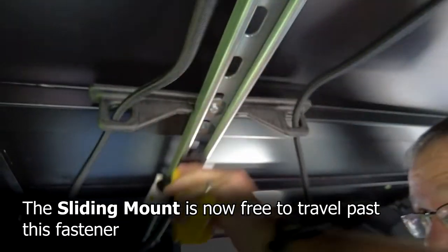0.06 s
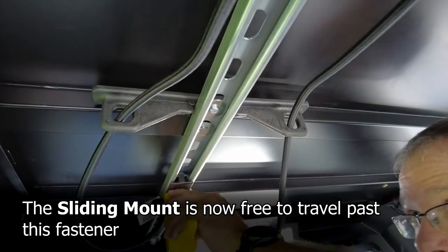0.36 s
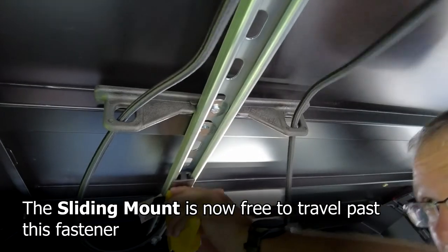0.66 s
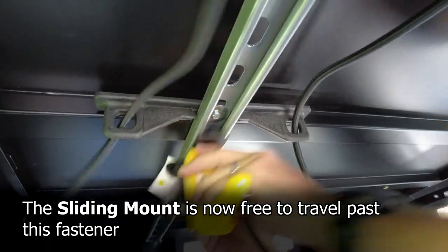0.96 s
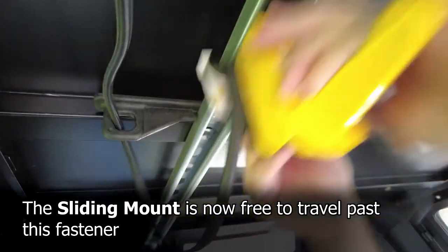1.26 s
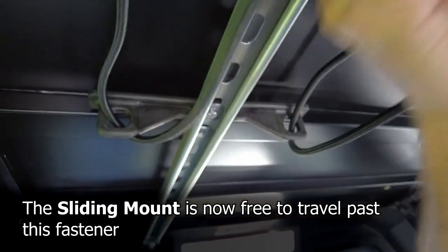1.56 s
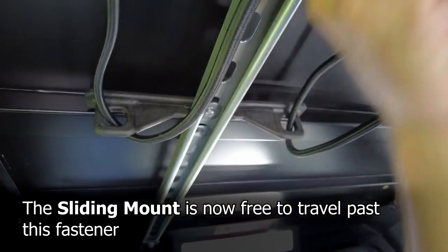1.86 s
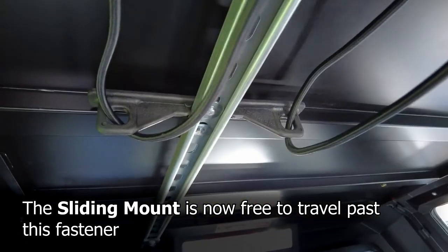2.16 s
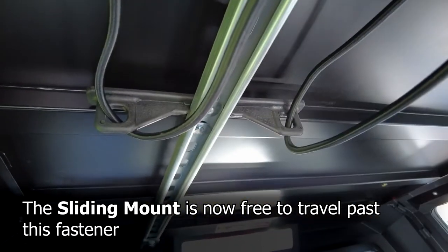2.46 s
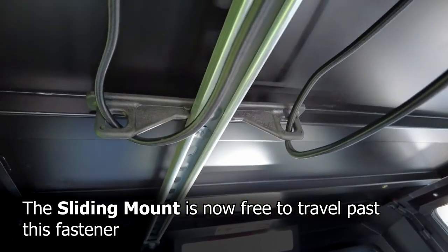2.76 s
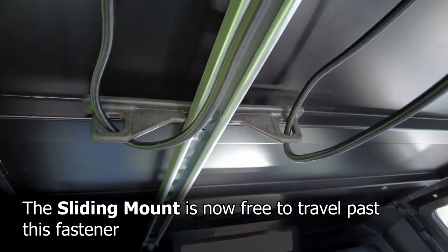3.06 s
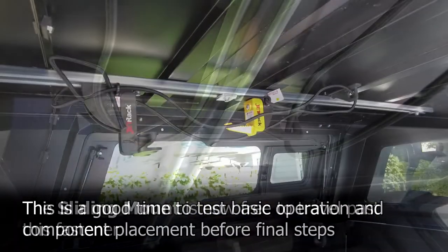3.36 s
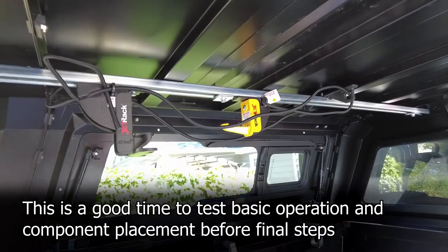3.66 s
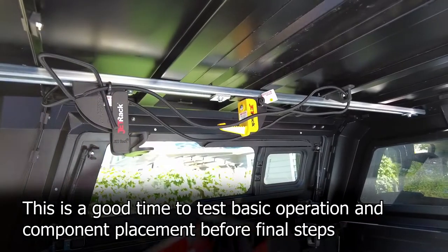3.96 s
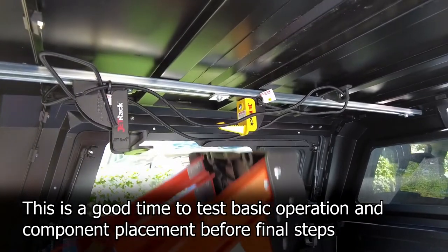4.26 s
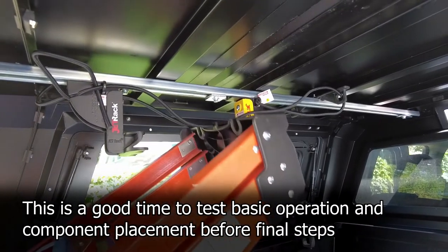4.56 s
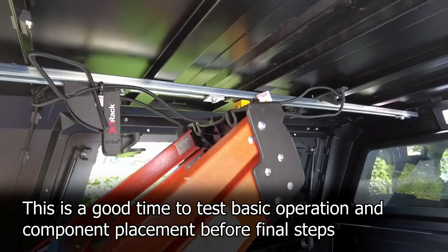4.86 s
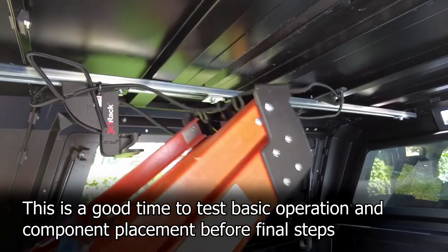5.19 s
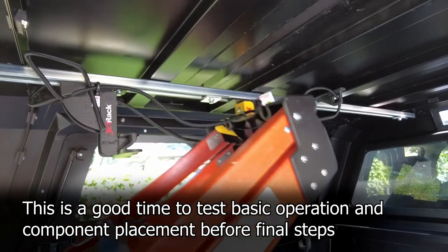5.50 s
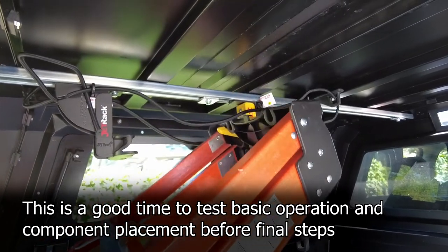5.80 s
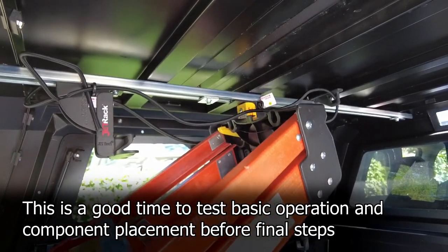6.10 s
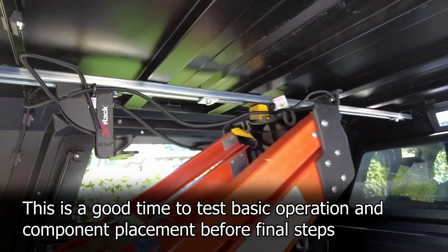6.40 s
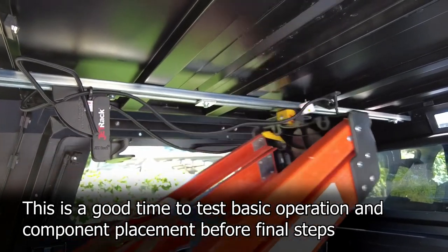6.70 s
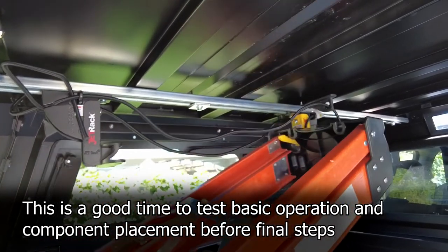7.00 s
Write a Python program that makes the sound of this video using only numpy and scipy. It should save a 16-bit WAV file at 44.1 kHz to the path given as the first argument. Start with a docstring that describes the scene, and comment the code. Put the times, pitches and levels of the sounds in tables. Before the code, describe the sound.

Inside a covered truck bed, a metal mount is pushed along a roof rail, grinding, juddering and briefly squealing before it clacks against its stop. A few light ticks follow in a lull. Then a ladder knocks and rattles onto the mount and drags it further, making the wide roof panel boom deeply. The sounds are close, with a short enclosed echo and faint insects outside.

```python
"""Under a truck cap (the shell over a truck bed), a metal mount is pushed along a roof rail.
Tiny catches make it grind and judder, the metal squeals as it binds, and the mount clacks on its stop.
Then a ladder is lifted, knocks and rattles onto the mount's hook and drags it further along the rail.
The pushes set the wide roof panel booming, the cap's panels tick lightly, and insects buzz outside."""
import sys
import numpy as np
from scipy import signal
from scipy.fft import rfft, irfft
from scipy.io import wavfile
from scipy.ndimage import uniform_filter1d

SR = 44100
rng = np.random.default_rng(int(sys.argv[2]) if len(sys.argv) > 2 else 0)


def dump_mix(stems):
    """Bounce the given channels to the path in sys.argv[1] as a 16-bit WAV at rate SR."""
    frames = np.atleast_2d(stems).T  # one column per channel
    limited = np.clip(frames, -1, 1)  # hard clip at full scale
    pcm = np.round(limited * 32767).astype(np.int16)
    wavfile.write(sys.argv[1], SR, pcm)


N = 314863
T = np.arange(N) / SR
THUD_BELOW_HZ, CRACK_ABOVE_HZ = 420, 2200  # a hit is a low thud, a middle ring and a high crack

# How strongly the rail sounds from bass to treble: f/Hz, level/dB
RAIL_SPECTRUM = [(65, -37.5), (110, -11.5), (177, 4.5), (227, -1.5), (358, -2), (397, -14.5), (459, -11.5),
                 (739, -24), (854, -18), (1140, -22.5), (1460, -14), (2310, -27), (3020, -29),
                 (3870, -30.5), (15500, -64.5)]
# Notes that the rail and roof, and the end stop, ring at: f/Hz, level/dB, time to fade by 60 dB/s
RAIL_NOTES = [(177, 0, .8), (212, -7, .6), (270, -9, .5), (333, -7, .6), (450, -13, .3), (850, -14, .25),
              (1265, -14, .15), (1335, -11, .12), (1440, -8, .1), (1530, -10, .1), (1690, -7, .17),
              (2000, -12, .15), (2790, -18, .12), (3060, -16, .07), (3560, -19, .07), (4500, -19, .04)]
STOP_NOTES = [(333, 1.5, 0.76), (852, -16, 0.29), (1280, -8, 0.1), (1297, 6, 0.11), (1647, -4.5, 0.09),
              (3010, -7.5, 0.029), (3590, -7.5, .04), (4444, -6.5, .022)]
# Clacks on the rail, and the hit and bounce at the stop: t/s, level/dB, hardness/dB, rattle time/s
RAIL_CLACKS = [(.68, -46, -3.5, 0.0043), (.8117, -26, -1.5, 0.0098), (.9234, -30, 0, 0.0097),
               (.9883, -32, -23.5, 0.0079), (1.0102, -27.5, 1.5, 0.0046), (1.138, -28, -4, 0.013),
               (1.2492, -31.5, 1, .0015), (1.4243, -37, -24, 0.007), (1.5036, -28, 2.5, 0.00332)]
STOP_CLACKS = [(1.6193, -14, -4, 0.00168), (1.6228, -12.5, -12, 0.0019)]
# Pushes along the rail: t/s, rise/s, hold/s, level/dB, pressure/dB
MOUNT_PUSHES = [(-.03, 0.054, 0.18, -35.5, -2), (.22, 0.05, 0.057, -42, 7), (.65, 0.025, 0.048, -52, 8),
                (.735, 0.13, 0.1, -40, -6.5), (.962, 0.031, 0.05, -27, 6),
                (1.02, 0.041, 0.028, -29.5, -5.5), (1.1, 0.038, .12, -29, 5.5), (1.27, 0.032, .14, -35, -1),
                (1.46, 0.048, 0.082, -33.5, -8), (1.7, 0.01, 0.064, -58, 25),
                (1.87, 0.012, 0.23, -71, 20.5), (2.12, .12, 0.031, -64, -13.5)]
def mount():
    """The metal mount clacks and grinds along its rail and bounces off the end stop."""
    rail = struck_part(RAIL_SPECTRUM, RAIL_NOTES, notes_db=-4, direct_db=-2.5)
    stop = struck_part(RAIL_SPECTRUM, STOP_NOTES, notes_db=1, direct_db=0)
    clacks = knocks(RAIL_CLACKS, rail, rattle_db=1.5, grit_db=-1.5,
                    thud_db=-4.5, thud_per_hardness=0.6, thud_lag_s=0.0029)
    clacks += knocks(STOP_CLACKS, stop, rattle_db=-6, grit_db=5,
                     thud_db=-8, thud_per_hardness=0.1, thud_lag_s=0.0025)
    pushes = strokes(MOUNT_PUSHES, sag_db_per_s=4.5, stop_db_per_s=261,
                     judder_db=-0.5, hiss_db=-3, hiss_per_pressure=0.43)
    return clacks + scrape(pushes, rail, RAIL_SPECTRUM, catches_per_s=1200,
                           grit_db=6.5, smooth_db=1, uneven_db=2, sheen_db=19.5)


# How strongly the ladder sounds from bass to treble: f/Hz, level/dB
LADDER_SPECTRUM = [(65, -21), (110, -10), (227, -6), (423, -10), (626, -8.5), (754, -21), (837, -10),
                   (967, -18.5), (1030, -12), (1380, -9.5), (1660, -10.5), (2260, -19), (3210, -15.5),
                   (3640, -19), (15500, -37.5)]
# Notes that the ladder rings at: f/Hz, level/dB, time to fade by 60 dB/s
LADDER_NOTES = [(148.4, -2, 0.86), (178.8, 3, 0.36), (214.4, 3, 0.53), (246.3, 1, 0.27), (357, -10, 0.55),
                (452, -4.5, 0.26), (625.5, -11, 0.16), (850.5, 2.5, 0.11), (1071, -0.5, 0.26),
                (1290, -16, .15), (1618, 0, 0.043), (1715, 2, 0.051), (1955, -12.5, 0.19),
                (2600, -18, 0.19), (2600, -6, 0.086), (3430, -13.5, 0.1), (4600, 4, 0.021)]
# Bumps of the ladder: t/s, level/dB, hardness/dB, rattle time/s
LADDER_BUMPS = [(4.42, -53.5, -8, 0.0025), (4.529, -33, -13, 0.0095), (4.5467, -29, -22, 0.011),
                (5.173, -29, -15.5, 0.006), (5.1865, -21, -17.5, 0.0041), (5.439, -21, -2.5, 0.01),
                (5.5299, -17.5, -8, 0.015), (5.545, -29.5, -23, 0.051), (5.574, -24, 0.5, 0.013),
                (5.748, -36.5, -22, 0.0026), (5.921, -41.5, -10, 0.011), (6.872, -24, -16.5, 0.015),
                (7.1, -42, -1.5, 0.011)]
# Drags of the ladder: t/s, rise/s, hold/s, level/dB, pressure/dB
LADDER_DRAGS = [(4.885, 0.0053, .14, -49.5, 10), (5.2, 0.028, .08, -45, 4.5),
                (5.412, 0.022, .005, -37.5, 3), (5.66, 0.05, 0.032, -52, 8.5),
                (5.96, 0.013, 0.022, -62, 18), (6.16, 0.62, .55, -39, 0), (6.58, 0.022, 0.079, -41, -7)]
def ladder():
    """The ladder rattles onto the hook and scrapes as it drags the mount along."""
    frame = struck_part(LADDER_SPECTRUM, LADDER_NOTES, notes_db=-3.5, direct_db=-6.5)
    bumps = knocks(LADDER_BUMPS, frame, rattle_db=12.5, grit_db=10.5,
                   thud_db=-4, thud_per_hardness=0.34, thud_lag_s=0.00691)
    drags = strokes(LADDER_DRAGS, sag_db_per_s=33.5, stop_db_per_s=143,
                    judder_db=3.5, hiss_db=-9, hiss_per_pressure=0.29)
    return bumps + scrape(drags, frame, LADDER_SPECTRUM, catches_per_s=1500,
                          grit_db=6, smooth_db=-0.5, uneven_db=2.5, sheen_db=4)


# How long the cap echoes, treble dying first: f/Hz, time to fade by 60 dB/s
CAP_ECHO = [(150, 0.67), (350, 0.38), (700, 0.38), (1500, 0.15), (3500, 0.12), (12000, 0.11)]
def struck_part(spectrum, notes, notes_db, direct_db):
    """One hit on a part under the cap: echoes and notes, split into thud, ring and crack of equal energy."""
    t = T[:SR]
    noise, echo = rfft(stereo_noise(SR)), 0
    centres_hz = np.geomspace(100, 16000, 9)
    for hz, share in zip(centres_hz, np.eye(len(centres_hz))):
        fade_s = look_up(CAP_ECHO, hz)
        band = irfft(noise * look_up(np.c_[centres_hz, share], np.arange(noise.shape[-1])), SR)
        echo = echo + band * die_away(t, fade_s) / np.sqrt(fade_s)
    echo = unit_rms(echo)
    echo[:, 0] += gain(direct_db) * np.sqrt(SR)  # the click that arrives before any echo
    # shape the tone but keep the start sharp (a minimum-phase filter)
    cepstrum = irfft(np.log(gain(look_up(spectrum, np.arange(SR // 2 + 1)))), SR)
    cepstrum[1:SR // 2] *= 2
    cepstrum[SR // 2 + 1:] = 0
    echo = irfft(rfft(echo) * np.exp(rfft(cepstrum)), SR)
    tones = 0
    for (hz, db, fade_s), (phase, lean) in zip(notes, rng.uniform(-0.95, 1, (len(notes), 2))):
        ear_shift = np.sign(lean) * np.arctan(gain(look_up(STEREO_WIDTH, hz))) * np.array([[1], [-1]])
        wave = np.sin(2 * np.pi * hz * t + np.pi * phase + ear_shift)
        tones = tones + gain(db) / np.sqrt(fade_s) * die_away(t, fade_s) * wave
    hit = unit_rms(echo) + gain(notes_db) * unit_rms(tones)
    bands = (THUD_BELOW_HZ, "low"), ((THUD_BELOW_HZ, CRACK_ABOVE_HZ), "band"), (CRACK_ABOVE_HZ, "high")
    return [unit_rms(keep_band(hit, hz, kind)) / np.sqrt(SR) for hz, kind in bands]


def knocks(table, part, rattle_db, grit_db, thud_db, thud_per_hardness, thud_lag_s):
    """Each knock is one hit and a dying rattle of loose parts; harder ones crack more and thud less."""
    out, size = np.zeros((2, N)), SR // 8
    for start_s, db, hardness_db, rattle_s in table:
        jolts, strength = rng.standard_normal((2, size))
        force = jolts * gain(grit_db * strength) * np.exp(-(T[:size] / (2 * rattle_s)) ** 2)
        force *= gain(rattle_db) / np.linalg.norm(force)
        force[0] += 1  # the hit itself
        levels_db = (db + thud_db - thud_per_hardness * hardness_db, db, db + hardness_db)
        for band, band_db, lag_s in zip(part, levels_db, (thud_lag_s, 0, 0)):
            sound = signal.fftconvolve(band, force[None], axes=1)
            peak_power = uniform_filter1d(np.mean(sound ** 2, axis=0), size=500).max()
            add(out, start_s + lag_s, gain(band_db) * sound / np.sqrt(peak_power))
    return out


def strokes(table, sag_db_per_s, stop_db_per_s, judder_db, hiss_db, hiss_per_pressure):
    """Loudness of judder, grind and hiss as slides rise, slow and stop; pressure trades hiss for judder."""
    power = np.zeros((3, N))
    for start_s, rise_s, hold_s, db, pressure_db in table:
        t = T - start_s - rise_s
        drop_db = sag_db_per_s * np.maximum(t, 0) + stop_db_per_s * np.maximum(t - hold_s, 0)
        swell = np.clip(1 + t / rise_s, 0, 1) * gain(db - drop_db)
        balance = gain([[judder_db + pressure_db], [0], [hiss_db - hiss_per_pressure * pressure_db]])
        power += (swell * balance) ** 2
    return np.sqrt(power)


def scrape(loudness, part, spectrum, catches_per_s, grit_db, smooth_db, uneven_db, sheen_db):
    """Sliding metal catches in tiny, uneven bunches that shake the part; the rubbing spot hisses."""
    judder, grind, rub = loudness
    bunches = gain(uneven_db * wander(70))
    catches = (rng.random(N) < catches_per_s / SR) * rng.standard_normal(N)
    catches *= gain(grit_db * rng.standard_normal(N))  # grit makes a few catches stand out
    force = unit_rms((unit_rms(catches) + gain(smooth_db) * rng.standard_normal(N)) * bunches)
    shake = sum(signal.oaconvolve(band, (force * amount)[None], axes=1)[:, :N]
                for band, amount in zip(part, (judder, grind)))
    delay_s = 0.0005 * wander(14)  # the rubbing spot moves, so the notes shift a little
    shake = np.array([np.interp(T - delay_s, T, side) for side in shake])
    sheen = [(4200, 0.0075), (15000, sheen_db)]  # fine roughness makes more top treble than a hit
    hiss = colour(colour(stereo_noise(N) * bunches, spectrum), sheen)
    return shake + unit_rms(keep_band(hiss, CRACK_ABOVE_HZ, "high")) * rub


# Short squeals of metal: t/s, f/Hz, level/dB, length/s
METAL_SQUEALS = [(0.097, 1620, -30, 0.042), (0.811, 2010, -24.5, 0.012), (1.423, 1484, -22.5, 0.015),
                 (1.956, 1706, -51, 0.03), (2.011, 1666, -40.5, 0.028), (2.275, 1664, -46.5, 0.0092),
                 (2.278, 1080, -57.5, 0.055), (5.525, 3180, -23.5, 0.028), (5.576, 1690, -20, 0.034),
                 (6.602, 1700, -38.5, 0.07), (6.866, 1656, -26, 0.016)]
def squeals(waver=0.011, rise_s=0.00079):
    """The metal binds and sings for a moment on one unsteady pitch."""
    out, t = np.zeros((2, N)), T[:SR // 4]
    for start_s, hz, db, length_s in METAL_SQUEALS:
        pitch_hz = hz * (1 + waver * wander(302.4)[:len(t)])
        phase = 2 * np.pi * np.cumsum(pitch_hz) / SR
        swell = (1 - np.exp(-t / rise_s)) / (1 + (t / length_s) ** 4)
        add(out, start_s, gain(db) * swell * np.sin(phase + np.array([[0], [0.9]])))
    return out


# Booms of the bending roof panel: t/s, level/dB, f/Hz
ROOF_BOOMS = [(0.327, -24.5, 50.4), (.765, -27.5, 54.2), (0.979, -26, 59), (1.1, -26.5, 50.9),
              (1.72, -25.5, 47.67), (4.929, -33, 49.6), (5.178, -10.5, 46.1), (5.614, -24, 47.2),
              (6.324, -20, 55.4), (6.415, -13.5, 58.9), (6.601, -24.5, 47.9), (6.88, -10.5, 65.2),
              (7.071, -15.5, 68.6)]
# How long a boom lasts, the deepest longest: f/Hz, time to fade by 60 dB/s
BOOM_FADE = [(47, 2.04), (51, 1.32), (56, 0.28), (64, 0.52)]
# The tone of the roof's rumble: f/Hz, level/dB
RUMBLE_SPECTRUM = [(12, -25.5), (28, -9), (38, -7), (48, -3.5), (62, -7.5), (85, -11.5), (115, -19),
                   (170, -27.5), (400, -105)]
def roof(shaking, push_s=0.014, rest_db=-56.5, flutter_db=-0.5):
    """The wide panel swings when pushed; whatever shakes it leaves a rumble that settles slowly."""
    booms, t = np.zeros((2, N)), T[:2 * SR]
    rise = np.sin(np.pi / 2 * np.minimum(t / push_s, 1)) ** 2
    for start_s, db, hz in ROOF_BOOMS:
        swell = rise * die_away(t - push_s, look_up(BOOM_FADE, hz))
        add(booms, start_s, gain(db) * swell * np.sin(2 * np.pi * hz * t))
    panel_shiver = linger(gain(-6) * shaking, seconds=0.0547)
    cap_sway = linger(gain(-12.5) * (shaking + booms), seconds=0.5)
    loudness = np.sqrt(gain(rest_db) ** 2 + panel_shiver + cap_sway)
    rumble = unit_rms(colour(stereo_noise(N), RUMBLE_SPECTRUM)) * loudness * gain(flutter_db * wander(16))
    return (booms + rumble) * gain([[-0.7], [0.7]])  # a little louder on the right


# The tone of the cap's panels: f/Hz, level/dB
PANEL_SPECTRUM = [(120, 1), (220, 2), (450, -14.5), (800, -11.5), (1500, -24.5), (2500, -20), (5200, -9.5),
                  (15000, -37)]
# Light taps on them: t/s, level/dB, hardness/dB, rattle time/s
PANEL_TAPS = [(1.9675, -62.5, 18, .0025), (2.012, -52, -22, 0.0054), (2.276, -55, -24, 0.0042),
              (2.599, -47, -9.5, .008), (2.6879, -44, -14.5, 0.0048), (2.9069, -48, -17, 0.002),
              (3.2761, -50, -6, 0.0046), (3.375, -58.5, -2, 0.01)]
def taps():
    """Light taps make the panels tick and faintly ring the rail and roof."""
    panel = struck_part(PANEL_SPECTRUM, RAIL_NOTES, notes_db=-11.5, direct_db=-4)
    return knocks(PANEL_TAPS, panel, rattle_db=7, grit_db=0,
                  thud_db=5.5, thud_per_hardness=0.11, thud_lag_s=0.00305)


# Groups of insects buzzing outside: start t/s, end t/s, level/dB, middle f/Hz
INSECT_GROUPS = [(-.3, 2.17, -62, 5500), (2.15, 2.91, -63.5, 4770), (3.3, 7.4, -59, 5470),
                 (3.35, 14, -64, 4115), (3.35, 12, -71.5, 7500)]
def insects(fade_s=0.46, first_call_s=3.96, call_every_s=0.634, call_s=0.46, call_db=-58):
    """Groups of insects buzz steadily while one repeats a falling call."""
    out = np.zeros((2, N))
    for start_s, end_s, db, hz in INSECT_GROUPS:
        fade = np.clip(0.5 + np.minimum(T - start_s, end_s - T) / fade_s, 0, 1)
        out += gain(db) * fade * buzz(np.full(N, hz), width_hz=640)
    progress = np.linspace(0, 1, int(call_s * SR))
    swell = gain(call_db) * np.sin(np.pi * progress ** 2)
    falling_hz = np.interp(progress, [0, 1], [5400, 3400])
    for time_s in np.arange(first_call_s, T[-1], call_every_s):
        add(out, time_s - 0.8 * call_s, swell * buzz(falling_hz, width_hz=610))
    return out


def buzz(hz, width_hz):
    """A distant insect buzz: a band of noise around a pitch that may move."""
    real, imag = keep_band(rng.standard_normal((2, 2, len(hz))), width_hz, "low", order=2)
    phase = 2 * np.pi * np.cumsum(hz) / SR
    return unit_rms(real * np.cos(phase) + imag * np.sin(phase))


# The tone of the air outside: f/Hz, level/dB
AIR_SPECTRUM = [(30, -10.5), (110, 3), (220, -3.5), (400, -11), (800, -18), (1500, -13), (2400, -18.5),
                (4000, -16), (6000, -22.5), (9000, -32.5), (15500, -35.5)]
def air(level_db=-59):
    """Outdoor air makes a faint, almost steady hush."""
    return unit_rms(colour(stereo_noise(N), AIR_SPECTRUM)) * gain(level_db + 0.23 * wander(0.82))


# How far left and right differ, against what they share: f/Hz, level/dB
STEREO_WIDTH = [(60, -19.5), (180, -15), (380, -7), (700, 3), (1300, -6), (2400, -4), (4400, 0.5),
                (12000, -4)]
def stereo_noise(size):
    """Noise that is alike on both sides in the bass and wide in the treble."""
    mid, side = rng.standard_normal((2, size))
    side = colour(side, STEREO_WIDTH)
    return np.array([mid + side, mid - side])


def gain(db):
    """Turn decibels into a multiplier."""
    return 10 ** (np.asarray(db) / 20)


def look_up(points, hz):
    """Read a table between its listed frequencies, on a log scale."""
    f, value = np.transpose(points)
    return np.interp(np.log(hz + 1), np.log(f), value)


def unit_rms(x):
    """Scale to an average power of 1."""
    return x / np.sqrt(np.mean(x ** 2))


def colour(x, spectrum):
    """Turn each frequency up or down as the spectrum says."""
    size = x.shape[-1]
    return irfft(rfft(x) * gain(look_up(spectrum, np.fft.rfftfreq(size, 1 / SR))), size)


def keep_band(x, hz, kind, order=3):
    """Keep only the lows, a middle band or the highs."""
    return signal.sosfilt(signal.butter(order, hz, kind, fs=SR, output="sos"), x)


def die_away(t, fade_s):
    """Fall by 60 dB every fade_s."""
    return np.exp(-np.log(1000) * t / fade_s)


def wander(turns_per_s):
    """A random drift around zero."""
    count = int(N / SR * turns_per_s) + 2
    return 0.76 * np.interp(T * turns_per_s, np.arange(count), rng.standard_normal(count))


def linger(x, seconds):
    """A sound's power, stored and slowly given back."""
    keep = np.exp(-1 / (seconds * SR))
    return signal.lfilter([1 - keep], [1, -keep], np.mean(x ** 2, axis=0))


def add(out, start_s, sound):
    """Mix a sound in at start_s."""
    i = max(int(start_s * SR), 0)
    out[:, i:i + sound.shape[-1]] += sound[..., :max(N - i, 0)]


def scene():
    """Mount, ladder and taps shake the roof, with insects and air behind them."""
    mount_sound, ladder_sound, tap_sound = mount(), ladder(), taps()
    shaking = gain(-2.5) * mount_sound + gain(2.5) * ladder_sound + tap_sound
    return mount_sound + ladder_sound + squeals() + roof(shaking) + tap_sound + insects() + air()


def record(dry, top_hz=15850):
    """Cut off the highest treble."""
    return signal.sosfilt(signal.ellip(10, 0.2, 80, top_hz, fs=SR, output="sos"), dry)


dry = scene()
out = record(dry)
dump_mix(out)
```